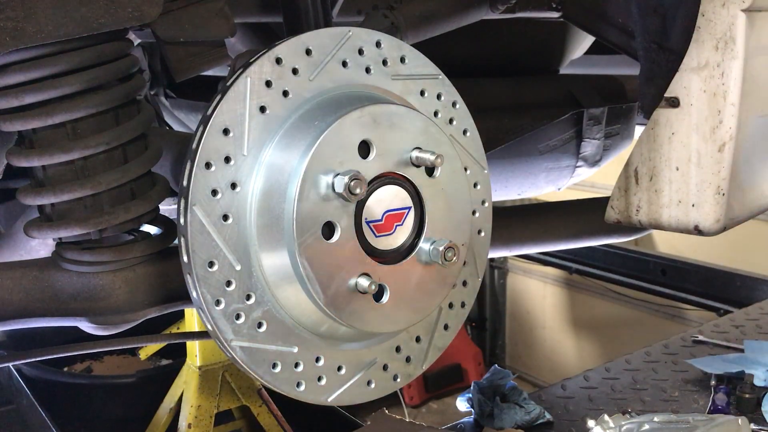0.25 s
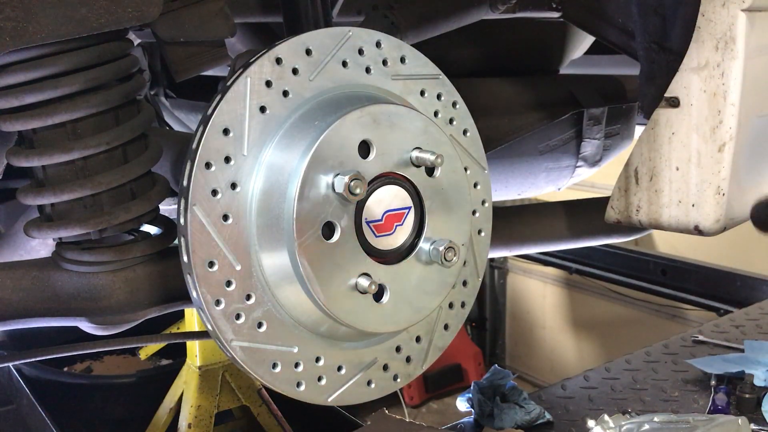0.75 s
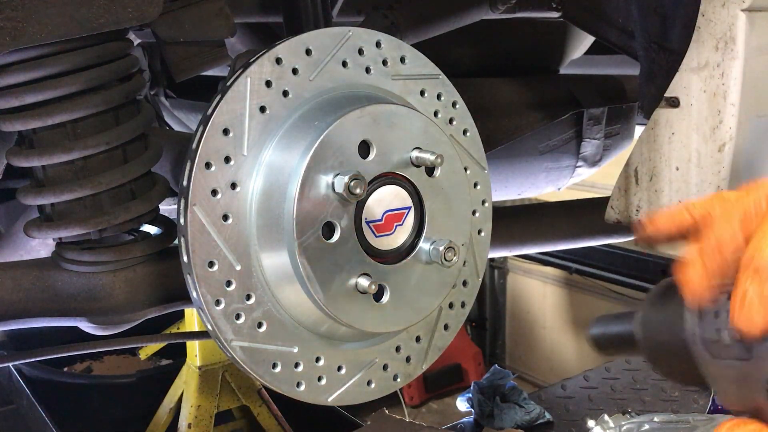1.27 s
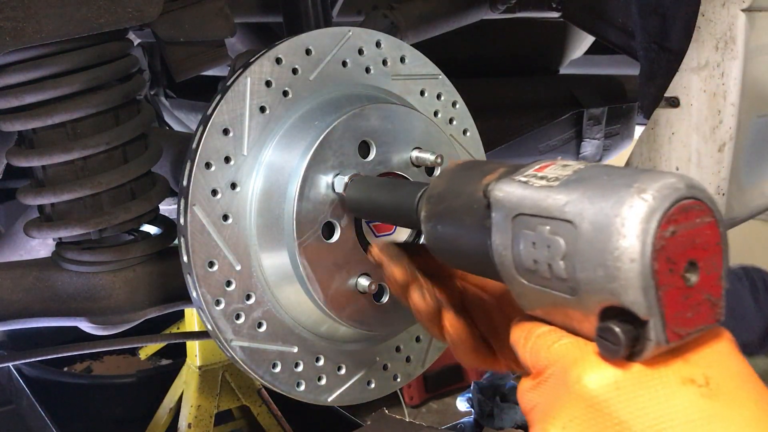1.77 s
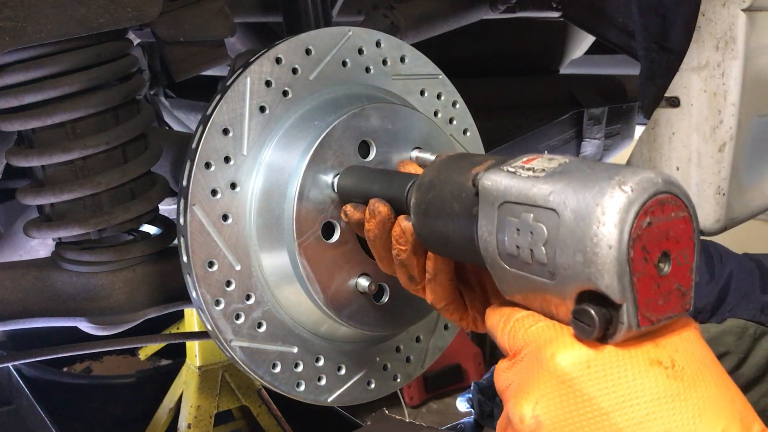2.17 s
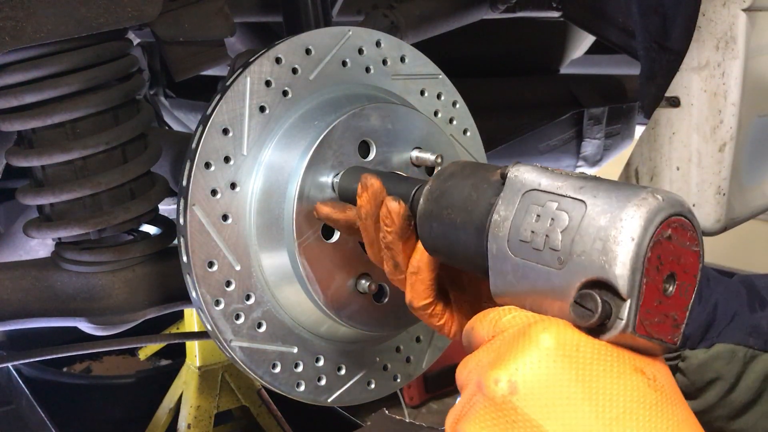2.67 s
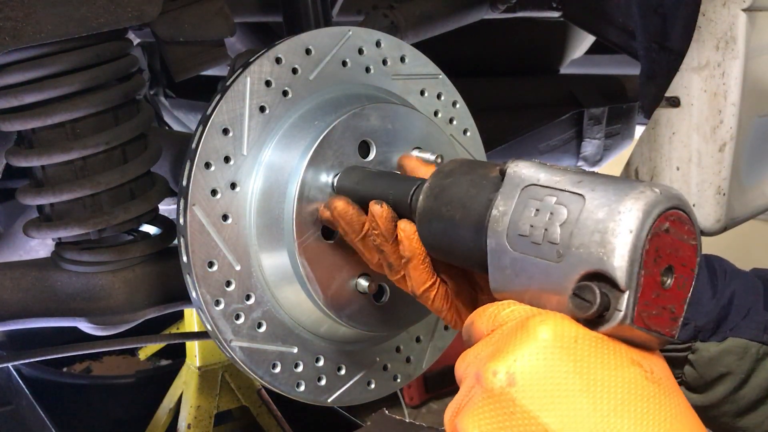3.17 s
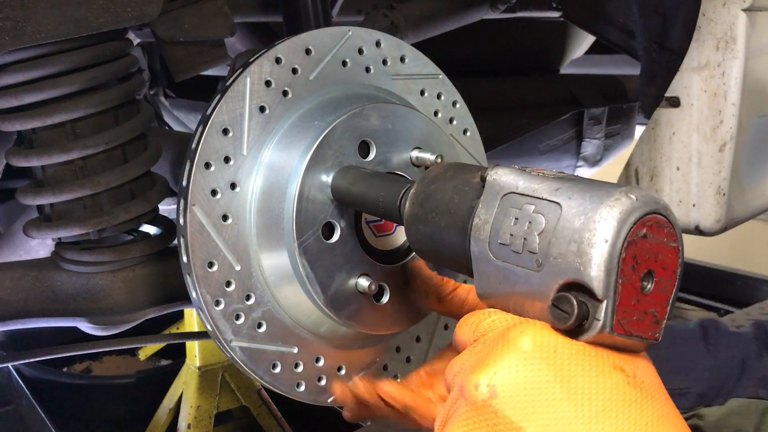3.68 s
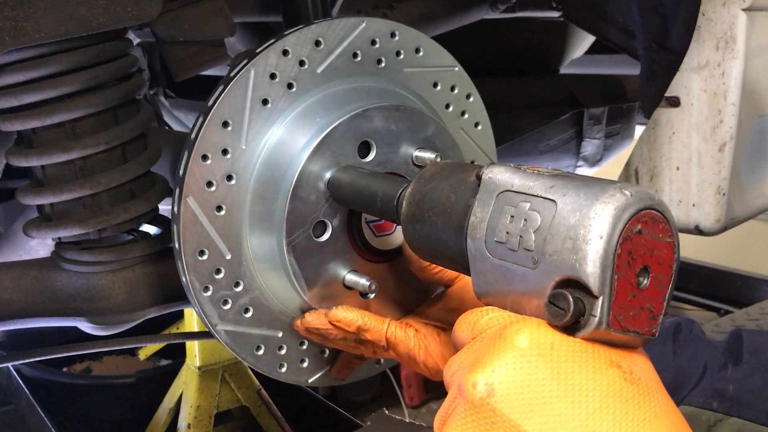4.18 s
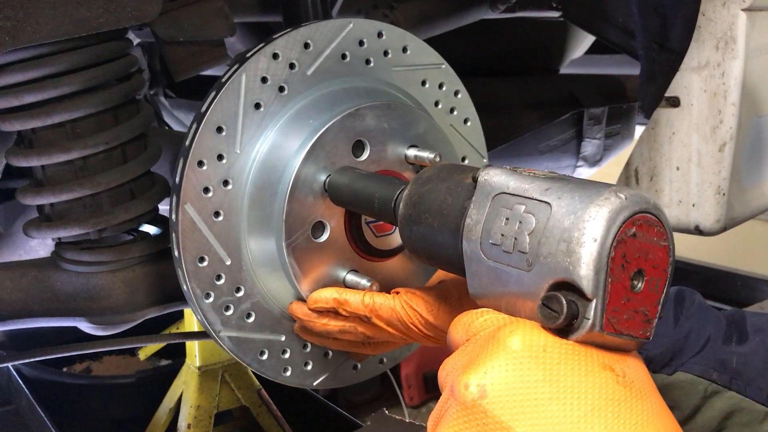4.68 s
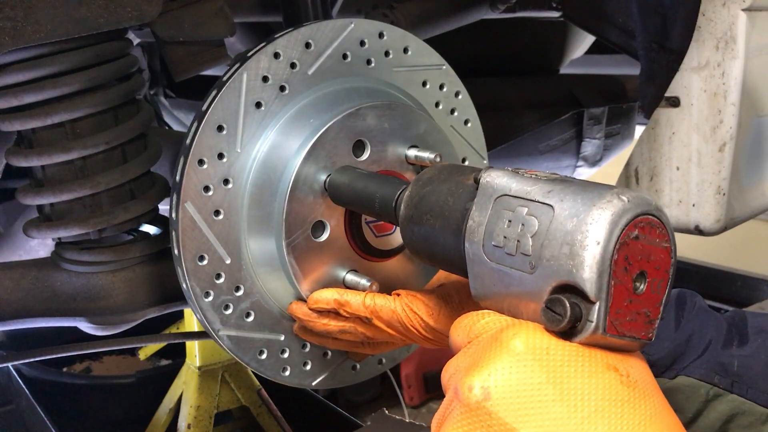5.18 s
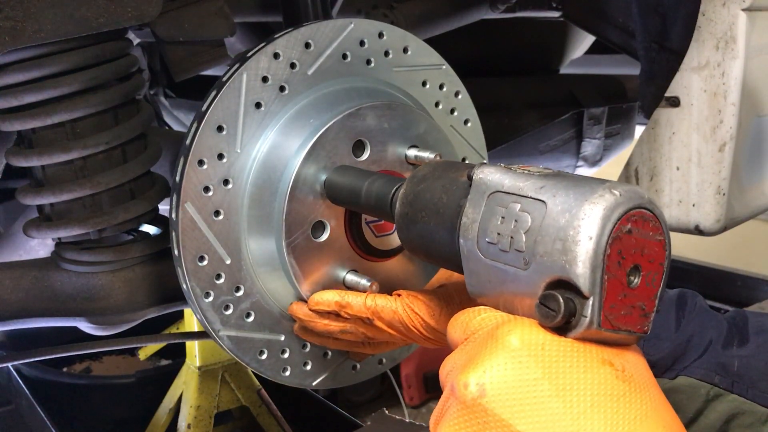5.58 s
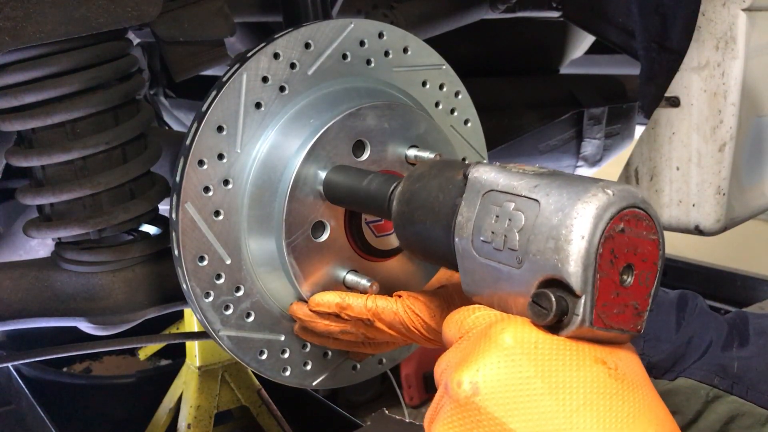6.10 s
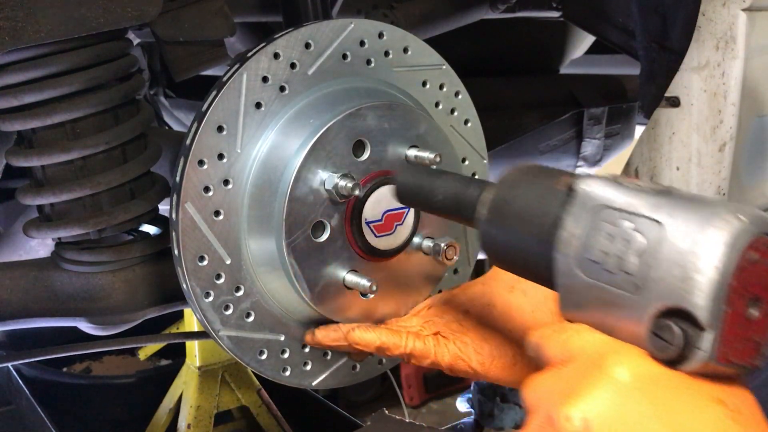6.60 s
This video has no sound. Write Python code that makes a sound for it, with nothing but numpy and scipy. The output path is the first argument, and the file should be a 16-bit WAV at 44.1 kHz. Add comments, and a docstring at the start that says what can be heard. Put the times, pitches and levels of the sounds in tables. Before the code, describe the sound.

Near microphone, small reverberant workshop: soft cloth and rubber-glove handling, a bright clack, light steel clinks, then two short runs of ringing rotor knocks. After a brief pause and a faint valve click, compressed air blasts for just over a second, with hard irregular hammering, rattling and a short rising motor hum. It stops abruptly; a loud steel snap and thin ping follow.

```python
"""An air impact wrench runs a lug nut onto a brake rotor in a garage: over quiet air, sleeves and hose rub (noise).
Bumps and snaps (noise bursts), a clack, and socket clinks on the nut (decaying steel modes) follow.
The loose rotor slides and clunks twice on its hub (random slips, damped modes); then the trigger valve clicks.
Exhaust roars (turbulent noise through resonances), hammer blows jolt the hub, the socket rattles, and for a
moment the freely spinning motor hums in harmonics; the air is shut off and the socket is pulled off."""
import sys
import numpy as np
from scipy import signal
from scipy.fft import rfft, irfft
from scipy.io import wavfile

SR = 44100
rng = np.random.default_rng(int(sys.argv[2]) if len(sys.argv) > 2 else 0)


def generate_wav(signal):
    """Clip the signal to [-1, 1] and save it as 16-bit WAV at the path in sys.argv[1]."""
    frames = np.transpose(np.atleast_2d(signal))
    scaled = np.clip(frames, -1, 1) * 32767
    pcm = np.round(scaled).astype(np.int16)
    wavfile.write(sys.argv[1], SR, pcm)


N = 302085
TIME = np.arange(N) / SR
BLOW = 32768  # samples computed for each blow

# All levels are relative; each sound may also apply a fixed gain.
# spectrum of the quiet garage air: (frequency [Hz], level [dB])
FLOOR_SPECTRUM = [(20, -18), (48, 8.5), (110, -2.5), (190, -4), (500, -13.5), (2000, -22.5), (6000, -30),
                  (16000, -32.5)]
FLOOR_DB = -61.5

# spectrum of soft rubbing of cloth and hose: (frequency [Hz], level [dB])
RUBBING_SPECTRUM = [(80, -30), (160, -9.5), (400, -5.5), (1200, -1.5), (1900, -6), (5500, -10),
                    (11000, -17), (16000, -17)]
# spectrum of the crisp swish: (frequency [Hz], level [dB])
SWISH_SPECTRUM = [(1000, -28.5), (2000, -12), (4000, -0.5), (8000, -3.5), (12000, -5.5), (16000, -3.5)]
# moves of the arms: (start [s], length [s], soft rubbing [dB], crisp swish [dB])
STROKES = [(0, 0.53, -50, -74), (.4, 0.095, -51, -42.5), (0.42, 0.21, -50.5, -58), (0.566, 1, -60.5, -54),
           (0.604, 0.069, -60, -50), (0.669, 0.13, -59, -48.5), (0.918, 0.22, -97, -43.5),
           (1.398, 0.067, -79, -46), (1.397, 0.39, -51, -60), (1.71, 0.24, -57.5, -76),
           (1.877, 0.21, -60.5, -55), (2.755, 0.27, -81, -52.5), (3.573, 0.28, -67, -57)]
STROKE_SKEW, STROKE_ROUND = 0.64, 1.1  # exponents of an arch that peaks early
HANDLING_DB, HANDLING_END_S = -61.5, 4.84  # faint rubbing while the tool is being positioned

# dry snaps of glove and hose: (time [s], level [dB])
SNAPS = [(.416, -34), (0.692, -31), (1.14, -33), (1.594, -32.5), (1.884, -40), (2.559, -42.5),
         (3.012, -40.5), (3.124, -48.5), (4.391, -38)]
# soft bumps of tool and hose in the hands: (time [s], level [dB])
BUMPS = [(0.433, -40), (1.099, -43)]

# light metal contacts of tool, socket and nut:
# (time [s], level [dB], pitch of the spot touched [Hz], ring [dB])
CLINKS = [(1.168, -29, 3040, -17), (1.66, -30, 5900, -33), (2.073, -38.5, 4200, -39),
          (2.209, -17, 6250, -16.5), (3.18, -31, 2680, -12.5), (3.236, -35, 1670, -14),
          (3.254, -23, 4380, -12), (3.299, -29, 3480, -27), (3.31, -25, 4790, -13.5),
          (3.418, -40, 3500, -23), (3.51, -40, 3240, -15), (6.612, -1, 9970, -30),
          (6.659, -10.5, 4370, -22.5)]
# spectrum of a steel crack: (frequency [Hz], level [dB])
CRACK_SPECTRUM = [(50, -21), (170, -2), (400, -7), (1100, 1.5), (2700, -0.5), (7000, -1.5), (9500, -5),
                  (11000, -15.5), (14000, -6), (16000, -24)]
# modes of the stud, socket and nut, each: (frequency [Hz], level [dB], t60 [s])
STUD_MODES = [(1911, -14, .12), (2342, -13, .33), (4452, -16, .22), (5335, -12, .19), (6675, -11, .15),
              (8745, -19, .15)]
SOCKET_MODES = [(1954, -6, .42), (3182, -19, .42), (4194, -17, .4), (5370, -16, .2), (8745, -21, .2)]
NUT_MODES = [(13500, -37.5, 1)]
PING_S = 6.613

# the tool is snatched up and clacks against something hard: (time [s], level [dB])
CLACKS = [(1.2526, -6), (1.294, -34)]

# pushes of the rotor along the studs: (start [s], seated [s], level on seating [dB])
PUSHES = [(3.857, 4.02, -27.5), (4.38, 4.638, -37)]
SLIDE_START_DB, SLIDE_FALL_DB_PER_S = -52.5, 165
# colour of each slip on the threads: (nominal frequency [Hz], width [Hz], gain [dB])
THREADS = [(100, 80, -10), (2495, 150, 21.5), (3135, 120, 25), (4520, 150, 20.5)]
SLIPS_PER_S, SLIP_SPREAD_DB, SLIP_T60_S = 170, 3.5, 0.11
SLIP_DETUNE = 0.046  # greatest share by which a slip's pitch departs from nominal
# knocks of the rotor on its hub, and last the click of the trigger valve:
# (time [s], level [dB], treble [dB], rotor ring [dB], socket ring [dB])
KNOCKS_AND_CLICK = [(3.9, -27, -17, -27.5, -40), (3.947, -28, -5, -26.5, -28),
                    (3.983, -17.5, -7, -18.5, -16), (4.046, -9, 3.5, -13.5, -30),
                    (4.403, -28.5, -23, -28.5, -46), (4.534, -21, -11, -22.5, -37),
                    (4.589, -16.5, -32, -37, -46), (4.658, -7, -5.5, -11, -20), (4.712, -9.5, -4, -16, -23),
                    (5.296, -33, -9, -30.5, -43)]
# spectrum of the dull body of a knock or click: (frequency [Hz], level [dB])
BODY_SPECTRUM = [(25, -28), (85, -2), (125, 6.5), (190, 5), (460, 1.5), (610, -9), (900, -6), (1300, -15),
                 (1600, -24), (7000, -26.5), (16000, -34)]
# modes of the rotor before the hand damps it: (frequency [Hz], level [dB], t60 [s])
ROTOR_MODES = [(133, -4, .5), (258, -6, .35), (350, -5, .35), (452, -1, .3), (840, -5.5, .85),
               (921, -14, .7), (1098, -11, .32), (1270, -7, .32), (1954, -12, .5), (2202, -13, .45),
               (2326, -7, .34), (3112, -10, .25), (3790, -13, .25), (4436, -12, .3), (7219, -7, .16)]
HAND_S, HAND_DAMPING_DB_PER_S = 4.49, 50  # from then on a hand steadies the rotor

# the trigger is eased to a leak, pulled fully, then let go
LEAK_S, OPEN_S, SHUT_S = 5.294, 5.334, 6.572
LEAK_DB, OPEN_DB, BLEED_DB = -45, -25.5, -52
VALVE_RISE_S, VALVE_FALL_S, LEAK_RISE_S = 0.0099, 0.011, 0.0074  # time constants
# spectrum of the exhaust air: (frequency [Hz], level [dB])
EXHAUST_SPECTRUM = [(59, -35), (100, -19.5), (836, -6.5), (2520, -5), (3860, -2.5), (5300, -7),
                    (7770, -20.5), (9210, -24.5), (16000, -16)]
# broad resonances of the exhaust ports: (frequency [Hz], width [Hz], gain [dB])
PORTS = [(1195, 430, 5.5), (5320, 260, 2.5), (6630, 1500, 8), (9120, 820, 21.5), (13500, 370, 11)]
# narrow resonances of the housing: (frequency [Hz], gain [dB])
HOUSING = [(1070, 4), (1290, 6.5), (2250, 6), (2980, 6), (3300, 9.5), (3790, 9.5), (4220, 6.5), (4440, 0),
           (5210, 7.5), (5440, 8.5), (5900, 9), (6380, 6.5), (7000, 7), (9880, 12)]
HOUSING_WIDTH_HZ = 98
BASS_LAG_S = 0.15  # low rumble and rattle begin this long after the valve opens
# the motor spins freely for a moment
FREE_S, LOADED_S, MOTOR_DB = 5.68, 6.116, -28
MOTOR_RISE_S, MOTOR_FALL_S = 0.095, 0.0051  # time constants
# mean speed of the motor: (time [s], rate [turns/s])
MOTOR_SPEED = [(5.718, 89), (5.788, 101), (5.867, 103.5), (5.899, 110.2), (5.947, 113.2), (5.967, 113),
               (6.111, 121.8)]
# response of the motor's case: (frequency [Hz], level [dB])
MOTOR_CASE = [(50, -26), (110, -6.5), (230, -7.5), (330, -0.5), (450, -4), (560, -16.5), (700, 5),
              (850, -8.5), (1090, 2.5), (1190, -12), (1290, 1.5), (1700, -37)]
HUM_FLUTTER_DB, SPEED_JITTER = 1.5, .006  # rms; the jitter is a share of the speed

# hammer blows on the anvil: (time [s], level [dB], treble before a fixed lift [dB], jolt into the hub [dB])
HAMMER = [(5.42, -20, -19, -22), (5.486, -1, -13, -12.5), (5.5126, -4.5, -11, -40),
          (5.576, -3.5, -16, -8.5), (5.609, -2.5, -18, -16), (5.6914, -5.5, -15, -12.5),
          (5.8118, 2.5, -4.5, -40), (6.1288, 1.5, -13.5, -35), (6.1876, -1, -10, -15),
          (6.2107, -4.5, -11, -16), (6.2737, 6, -17, -16), (6.351, -4, -5, -18), (6.3638, -6, -16, -29),
          (6.377, -6, -15, -13), (6.4416, 4.5, -15, -24), (6.515, -6.5, 2, -16.5), (6.5402, -6, -17, -15)]
# spectrum of the struck anvil: (frequency [Hz], level [dB])
ANVIL_SPECTRUM = [(300, -6.5), (1200, 4), (3000, 1), (5000, -4), (8000, 4), (11800, 2), (13700, 5),
                  (16000, -11)]
# modes of the nut on its stud: (nominal frequency [Hz], level [dB], t60 [s])
KNOCK_MODES = [(1057, 0.5, 0.03), (1293, -0.5, 0.036)]
KNOCK_SPREAD = 0.065  # greatest upward share by which the knock's pitch shifts
# modes of hub and suspension: (frequency [Hz], level [dB], t60 [s])
THUD_MODES = [(85, -19, 0.12), (119.6, -2.5, 0.055), (177, -5.5, 0.04), (297, -5, 0.027),
              (402, -20.5, 0.049)]
JOLT_LAG_S = 0.00607  # the hub answers just after the blow
# squeaks of the socket round the nut: (middle [s], level [dB], pitch [Hz])
SCRUBS = [(5.471, -19.5, 3630), (5.747, -22.5, 9700), (5.87, -24, 9700), (6.111, -23, 5574),
          (6.176, -18.5, 4270), (6.338, -15.5, 4000), (6.499, -16, 4150)]
RATTLES_PER_S = 120

# decay of the garage: (frequency [Hz], t60 [s])
GARAGE_DECAY = [(100, 0.92), (1500, 0.63), (5000, 0.35), (14000, 0.27)]
LOW_CUT_HZ, HIGH_CUT_HZ = 39, 16100  # low and high cut of the output


def amp(db):
    """Logarithmic level: decibels to amplitude gain."""
    return 10 ** (np.asarray(db) / 20)


def evened(x):
    """Normalization: scales to a root-mean-square of one."""
    return x / np.sqrt(np.mean(x ** 2) + 1e-20)


def read(points, hz):
    """Interpolation: reads a table on a logarithmic frequency axis."""
    f, value = np.transpose(points)
    return np.interp(np.log(hz + 1), np.log(f + 1), value)


def add(mix, s, sound):
    """Superposition: sums a sound into the mix from a given time [s]."""
    part = mix[max(round(s * SR), 0):][:len(sound)]
    part += sound[:len(part)]


def wander(hz):
    """Low-pass random process: Gaussian roll-off about a rate, rms one."""
    f = np.fft.rfftfreq(N, 1 / SR)
    spectrum = rfft(rng.standard_normal(N))
    return evened(irfft(spectrum * np.exp(-(f / hz) ** 2), N))


def noise(spectrum, peaks=(), treble_db=0, size=N):
    """Random-phase synthesis: noise of a given colour, resonances and treble shelf."""
    f = np.fft.rfftfreq(size, 1 / SR)
    db = read(spectrum, f) + treble_db * f ** 4 / (f ** 4 + 7000. ** 4)
    for hz, width, peak_db in peaks:
        db = db + peak_db / (1 + (2 * (f - hz) / width) ** 2)
    phases = np.exp(2j * np.pi * rng.random(len(f)))
    return evened(irfft(phases * amp(db), size))


def decay(t60, rise, size=BLOW):
    """Damping: quick rise, then an exponential fall of 60 dB in t60."""
    t = TIME[:size]
    return (1 - np.exp(-t / rise)) * np.exp(-np.log(1000) * t / max(t60, 1e-3))


def held(start, stop, rise, fall):
    """First-order response: rises from start, holds, and dies away after stop."""
    rising = 1 - np.exp(-np.maximum(TIME - start, 0) / rise)
    return rising * np.exp(-np.maximum(TIME - stop, 0) / fall)


def ring(modes, scatter_db):
    """Modal superposition: damped sinusoids, weighted anew at every blow."""
    out = np.zeros(BLOW)
    for hz, db, t60 in modes:
        weight = amp(db + scatter_db * rng.standard_normal())
        sine = np.sin(2 * np.pi * (hz * TIME[:BLOW] + rng.random()))
        out += weight * decay(t60, 0.0013) * sine
    return out


def random_impulses(per_s, spread_db):
    """Poisson-like process: impulses at chance times with exponentially spread levels."""
    excess = np.minimum(rng.exponential(1, N), 3)
    return (rng.random(N) < per_s / SR) * amp(spread_db * excess)


def background():
    """Stationary noise of quiet air, with a frequency-modulated hum of a distant machine."""
    turns = np.cumsum(111 * (1 + 0.04 * wander(11.2))) / SR
    hum = np.sin(2 * np.pi * turns) * amp(4.2 * wander(8.1))
    return amp(FLOOR_DB) * noise(FLOOR_SPECTRUM) + amp(-62.0) * hum


def rustle():
    """Friction noise: cloth and hose rub softly, with crisp grainy swishes on some moves."""
    soft = amp(HANDLING_DB) * held(0, HANDLING_END_S, 0.00087, 0.14)
    crisp = np.zeros(N)
    for s, length, soft_db, crisp_db in STROKES:
        progress = np.linspace(0, 1, round(length * SR))
        arch = abs(np.sin(np.pi * progress ** STROKE_SKEW)) ** STROKE_ROUND
        add(soft, s, amp(soft_db) * arch)
        add(crisp, s, amp(crisp_db) * arch ** 1.73)  # the swish gathers at the height of the move
    rubbing = soft * noise(RUBBING_SPECTRUM) * amp(1.5 * wander(48))
    return rubbing + crisp * noise(SWISH_SPECTRUM) * amp(1.4 * wander(400))


def snaps():
    """Sudden release: rubber glove and hose let go with short dry ticks."""
    spectrum = [(200, -23), (1300, 1), (4000, 1.0), (9000, -8.0), (16000, -6)]
    out = np.zeros(N)
    for s, db in SNAPS:
        tick = noise(spectrum, size=4096) * decay(0.052, 0.00017, size=4096)
        add(out, s, amp(db - 4.5) * tick)
    return out


def bumps():
    """Padded impact: dull low-frequency pushes without ringing modes."""
    spectrum = [(30, -18.5), (110, 1.5), (330, -3.5), (900, -33.0)]
    out = np.zeros(N)
    for s, db in BUMPS:
        add(out, s, amp(db) * noise(spectrum, size=BLOW) * decay(0.18, 0.0026))
    return out


def clinks(count=20):
    """Impact excitation: a crack and clatter about the spot touched, then modes of stud, socket or nut."""
    out = np.zeros(N)
    for s, db, hz, ring_db in CLINKS:
        # a higher spot also has a brighter crack
        crack = noise(CRACK_SPECTRUM, [(hz, 0.22 * hz, 9)], treble_db=11 * np.log2(hz / 6500), size=BLOW)
        crack = crack * decay(0.034, 0.00078)
        clatter_modes = [(f, -11, .09) for f in hz * rng.uniform(0.51, 1.35, count)]
        clatter = ring(clatter_modes, 2.8) * amp(2.7 * wander(150)[:BLOW])
        modes = SOCKET_MODES if s > SHUT_S else STUD_MODES  # the socket rings once it is pulled free
        ringing = clatter + ring(modes, 2)
        add(out, s, amp(db) * (amp(-7) * crack + amp(ring_db) * ringing))
    add(out, PING_S, ring(NUT_MODES, 0))  # the nut pings as the socket leaves it
    return out


def clacks():
    """Hard impact: a bright broadband crack with a slower-decaying, dense midrange."""
    crack_spectrum = [(150, -23.0), (500, -8.5), (1100, 5.0), (2400, 0), (8000, 2.0), (16000, 0)]
    linger_spectrum = [(200, -22.5), (1200, 4.5), (2900, 13.5), (4000, -2), (16000, -33.5)]
    out = np.zeros(N)
    for s, db in CLACKS:
        crack = noise(crack_spectrum, size=BLOW) * decay(0.014, 0.00031)
        linger = noise(linger_spectrum, size=BLOW) * decay(0.25, 0.0028)
        add(out, s, amp(db) * (crack + amp(-26.0) * linger))
    return out


def sliding():
    """Sliding friction: each push scrapes harder until the rotor seats, then dies away."""
    out = np.zeros(N)
    for start, seated, db in PUSHES:
        growth_db = np.interp(TIME, [start, seated], [SLIDE_START_DB, db])
        fall_db = SLIDE_FALL_DB_PER_S * np.maximum(TIME - seated, 0)
        out += (TIME > start) * amp(growth_db - fall_db)
    return out


def chatter(count=12):
    """Stick-slip: many small slips on the threads briefly ring the metal at slightly different pitches."""
    out = np.zeros(N)
    for shift in 1 + SLIP_DETUNE * np.linspace(-1, 1, count):
        slips = random_impulses(SLIPS_PER_S / count, SLIP_SPREAD_DB)
        peaks = [(shift * hz, width, db) for hz, width, db in THREADS]
        tick = noise(BODY_SPECTRUM, peaks, size=8192) * decay(SLIP_T60_S, 0.00033, size=8192)
        out += signal.oaconvolve(slips, tick)[:N]
    return evened(out)


def rotor_and_valve_click():
    """Impact and modal damping: the loose rotor chatters and knocks, and last the trigger valve clicks."""
    out = sliding() * chatter()
    for s, db, treble_db, rotor_db, socket_db in KNOCKS_AND_CLICK:
        crack = noise(CRACK_SPECTRUM, [(2200, 240, 4.5)], treble_db=-10.5, size=BLOW) * decay(0.054, 0.0013)
        # the dull body outlasts the crack
        body = noise(BODY_SPECTRUM, [(4000, 3200, -12)], treble_db=-37.5, size=BLOW) * decay(0.3, 0.0021)
        hand_s = np.maximum(s + TIME[:BLOW] - HAND_S, 0)
        damped = amp(-HAND_DAMPING_DB_PER_S * hand_s)
        impact = amp(treble_db - 7) * crack + amp(-11.5) * body
        impact += amp(rotor_db) * damped * ring(ROTOR_MODES, 0.5)
        impact += amp(socket_db) * ring(SOCKET_MODES, 0.98)
        add(out, s, amp(db) * impact)
    return out


def airflow():
    """Valve flow: a leak, full flow, and a faint bleed after it shuts."""
    leak = amp(LEAK_DB) * held(LEAK_S, OPEN_S, LEAK_RISE_S, VALVE_FALL_S)
    full = amp(OPEN_DB) * held(OPEN_S, SHUT_S, VALVE_RISE_S, VALVE_FALL_S)
    bleed = amp(BLEED_DB) * held(SHUT_S, TIME[-1], VALVE_RISE_S, VALVE_FALL_S)
    return leak + full + bleed


def housing():
    """Resonance of the shell as (frequency [Hz], width [Hz], gain [dB])."""
    return [(hz, HOUSING_WIDTH_HZ, db) for hz, db in HOUSING]


def exhaust():
    """Turbulence: air hisses and rumbles out through the housing, chopped at the motor's speed."""
    s, speed = np.transpose(MOTOR_SPEED)
    speed = np.interp(TIME, s, speed) * (1 + SPEED_JITTER * wander(53))
    turns = np.cumsum(speed) / SR
    chop = 1 + 0.15 * np.cos(2 * np.pi * turns)
    air = airflow() * noise(EXHAUST_SPECTRUM, PORTS + housing()) * chop * amp(2.33 * wander(56))
    rumble = noise([(30, -27), (110, -0.5), (400, -4.5), (900, -31), (2000, -54)])
    rumble_level = amp(-37) * held(OPEN_S + BASS_LAG_S, SHUT_S, VALVE_RISE_S, VALVE_FALL_S)
    return air + rumble * rumble_level + motor(speed, turns)


def motor(speed, turns, count=13):
    """Source and filter: harmonics of the turning rate glide through the case's resonances over churning air."""
    hum = np.zeros(N)
    for k in range(1, count + 1):
        hum += amp(read(MOTOR_CASE, k * speed)) * np.cos(2 * np.pi * (k * turns + rng.random()))
    hum = evened(hum) * amp(HUM_FLUTTER_DB * wander(65))
    churn = noise(MOTOR_CASE, [(1100, 390, 9.4)])
    return amp(MOTOR_DB) * held(FREE_S, LOADED_S, MOTOR_RISE_S, MOTOR_FALL_S) * (hum + churn)


def hammer():
    """Impulse transfer: steel blows on the anvil jolt the hub, with the socket scrubbing among them."""
    out = np.zeros(N)
    for s, db, treble_db, jolt_db in HAMMER:
        # each blow lands differently and favours other short steel resonances
        spots = [(hz, 700, 5) for hz in rng.uniform(2900, 15500, 5)]
        crack = noise(ANVIL_SPECTRUM, spots + housing(), treble_db=treble_db + 11.0, size=BLOW)
        crack = crack * decay(0.028, 0.00051)
        add(out, s, amp(db) * (amp(-5.5) * crack + amp(-32.0) * ring(SOCKET_MODES, 3.3)))
        shift = 1 + KNOCK_SPREAD * rng.uniform(-0.76, 1)
        knock = ring([(shift * hz, mode_db, t60) for hz, mode_db, t60 in KNOCK_MODES], 1.3)
        add(out, s + JOLT_LAG_S, amp(jolt_db) * (knock + ring(THUD_MODES, 0.82)))
    for s, db, hz in SCRUBS:
        scrub = noise([(hz / 4, -30), (hz, 0), (hz * 2, -17)], housing())
        out += amp(db) * np.exp(-((TIME - s) / 0.0083) ** 2) * scrub
    return out


def rattle(count=16):
    """Random impacts: the loose socket ticks on the square drive at many pitches."""
    out = np.zeros(N)
    for hz in np.geomspace(2500, 14000, count):
        impacts = random_impulses(RATTLES_PER_S / count, 4.6)
        tick = noise(ANVIL_SPECTRUM, [(hz, 0.069 * hz, 14)] + housing(), size=2048)
        tick = tick * decay(0.05, 0.00083, size=2048)
        out += signal.oaconvolve(impacts, tick)[:N]
    level = amp(-31.5) * held(OPEN_S + BASS_LAG_S, SHUT_S, VALVE_RISE_S, VALVE_FALL_S)
    return level * evened(out)


def garage(x):
    """Reverberation: quick echoes from the wheel well, then a diffuse tail that dies by band."""
    near = rng.standard_normal(SR) * (rng.random(SR) < 1500 / SR) * decay(0.047, 0.0034, size=SR)
    hz, t, bands = signal.stft(rng.standard_normal(SR), SR, nperseg=256)
    band_decay = np.exp(-np.log(1000) * t / read(GARAGE_DECAY, hz)[:, None])
    tail = signal.istft(bands * band_decay, SR, nperseg=256)[1][:SR]
    tail = tail * (1 - np.exp(-TIME[:SR] / 0.0049))
    echoes = amp(-13.0) * near / np.linalg.norm(near) + amp(-14.5) * tail / np.linalg.norm(tail)
    return x + signal.fftconvolve(x, echoes)[:N]


def scene():
    """Superposition of the sources, with the metal and exhaust sounds reverberated."""
    reverberant = clinks() + clacks() + rotor_and_valve_click() + exhaust() + hammer() + rattle()
    direct = background() + rustle() + snaps() + bumps()
    return (garage(reverberant) + direct)[None]


def record(dry):
    """Output stage: low cut, soft limiter, then high cut."""
    low_cut = signal.butter(2, LOW_CUT_HZ, "highpass", fs=SR, output="sos")
    dry = signal.sosfilt(low_cut, dry)
    limited = .9 * np.tanh(dry / .9)
    high_cut = signal.firwin(511, HIGH_CUT_HZ, window=("kaiser", 9), fs=SR)
    return signal.oaconvolve(limited, high_cut[None], "same")


dry = scene()
out = record(dry)
generate_wav(out)
```